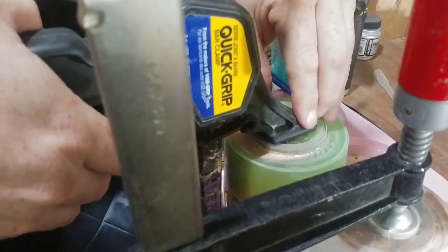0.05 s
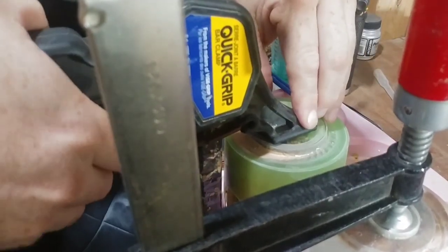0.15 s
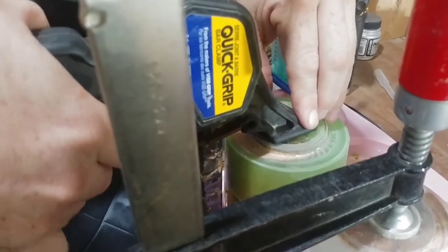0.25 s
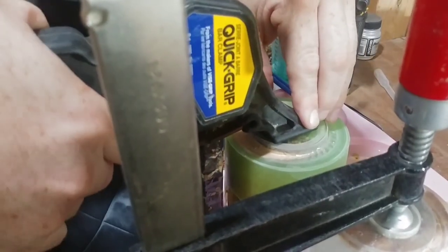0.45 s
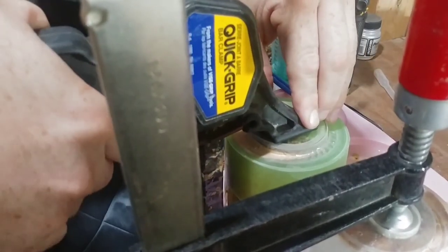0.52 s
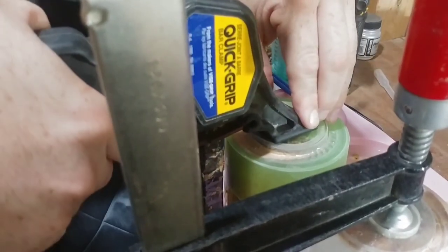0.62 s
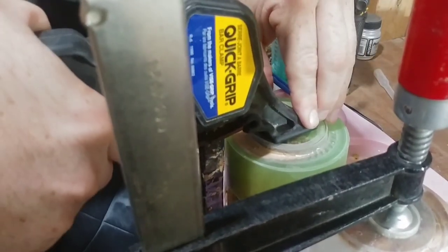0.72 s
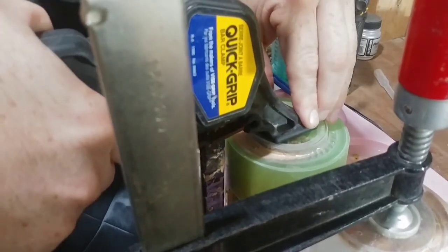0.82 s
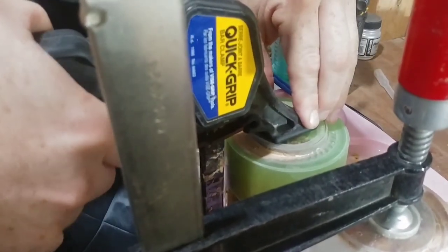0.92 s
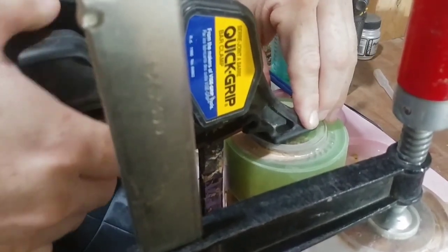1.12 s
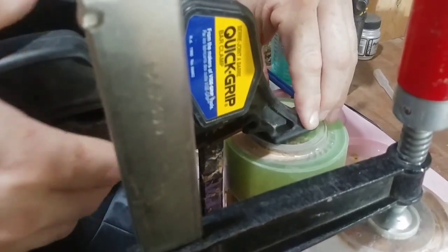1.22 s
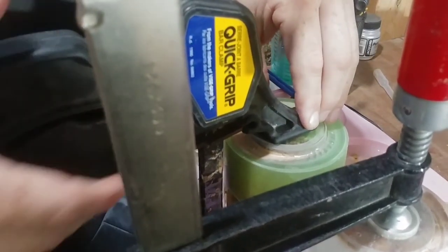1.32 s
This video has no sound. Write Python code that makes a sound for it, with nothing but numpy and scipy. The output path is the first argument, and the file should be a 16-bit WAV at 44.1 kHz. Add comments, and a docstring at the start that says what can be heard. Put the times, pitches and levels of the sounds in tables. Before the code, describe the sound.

A bar clamp ratchets tight with three hard, rising metallic clicks, after soft hand bumps on a bench

```python
"""Soft hand bumps come first, as ringing modes of the work with a grainy scuff, over swells of low rumble.
Then a bar clamp is squeezed: its ratchet plate snaps along the steel bar, the grip knocks and the wooden
bench booms, all from dying modes plus a noise crack. A weaker run of snaps follows, then a last bump.
Skin and grip rustle between as patchy noise; shop reflections follow each blow, and a two-tone mains hum
and room hiss last throughout."""
import sys
import numpy as np
from scipy import signal
from scipy.fft import rfft, irfft
from scipy.io import wavfile
from scipy.ndimage import uniform_filter1d

SR = 44100
rng = np.random.default_rng(int(sys.argv[2]) if len(sys.argv) > 2 else 0)


def bounce(signal):
    """Save signal as a 16-bit WAV file at the path given by the first command-line argument."""
    frames = np.transpose(np.atleast_2d(signal))
    limited = np.clip(frames, -1, 1)
    pcm = np.round(limited * 32767).astype(np.int16)
    wavfile.write(sys.argv[1], SR, pcm)


N = 59535  # length [samples]


def amp(db):
    """Turns decibels into a linear gain."""
    return 10 ** (np.asarray(db) / 20)


def evened(x):
    """Scales a signal to an rms of 1."""
    return x / np.sqrt(np.mean(x ** 2) + 1e-20)


def read(points, hz):
    """Reads a curve of (frequency, value) points along a logarithmic frequency axis."""
    f, value = np.transpose(points)
    return np.interp(np.log(hz + 1), np.log(f + 1), value)


def add(mix, start_s, sound):
    """Lays a two-channel sound into the mix, cut off at the end."""
    part = mix[:, round(start_s * SR):][:, :sound.shape[1]]
    part += sound[:, :part.shape[1]]


def coloured(x, gain):
    """Filters by a gain that is a function of frequency."""
    size = x.shape[-1]
    return irfft(rfft(x) * gain(np.fft.rfftfreq(size, 1 / SR)), size)


MODE_SCATTER_RAD, MODE_SCATTER_DB = 0.63, 1.5  # phase scatter near 1 kHz; level scatter


def ring(modes, t, rise_turns):
    """Dying sines; every blow lands a little differently and reaches each microphone differently."""
    hz, db, t60 = np.transpose(modes)[:, :, None]
    level, turn, left, right = rng.standard_normal((len(modes), 4)).T[:, :, None]
    spread = MODE_SCATTER_RAD * np.clip(hz / 1000, .3, 1.5)
    swell = 1 - np.exp(-t * hz / rise_turns)  # time constant in cycles of the mode
    envelope = amp(db + MODE_SCATTER_DB * level - 60 * t / t60) * swell
    ears = []
    for ear in (left, right):
        sines = np.sin(2 * np.pi * hz * t + spread * (turn + ear))
        ears.append((envelope * sines).sum(0))
    return np.array(ears)


# Snaps and knocks of the clamp: (time [s], level [dB], steel treble share [dB], grip body share [dB],
# bench boom share [dB], rebound delay [s], rebound against the blow [dB])
SNAPS = [(.445, -34.5, -55, 10.5, -5.5, .005, -47), (0.488, -44.5, -19.5, -16, 10, .008, -25),
         (0.508, -49.5, -34, 21.5, 9, .005, -14), (0.5557, -22.5, -11, 1.5, -5.5, .012, -17),
         (0.607, -18, -7, -3, -7.5, .011, -13), (0.69, -16.5, -2.5, -5.5, -11, .010, -32),
         (0.9179, -26, -32, 0, -13.5, .005, -10), (0.933, -43, -18, 2, -9, 0.0052, 1.5),
         (0.975, -45.5, -32, 4, -3.5, 0.0077, -11), (1.089, -58.5, -18, 9, 16.5, 0.018, -5.5)]
# Modes of bar and grip: (frequency [Hz], relative level [dB], t60 [s])
CLAMP_MODES = [(405, -4.5, 0.06), (536, -8, 0.086), (595, 0.5, 0.03), (825, -6.5, 0.01), (1082, 5, 0.022),
               (1276, -1, 0.03), (1442, -9.5, 0.03), (1489, 3, 0.029), (1572, -4.5, 0.037),
               (1810, -5, 0.025), (2116, -7, 0.045), (2380, -14, 0.027), (2790, -5, 0.0069),
               (3980, -6.5, 0.03)]
# Modes of the bench top: (frequency [Hz], relative level [dB], t60 [s])
BENCH_MODES = [(78.3, -6.5, 0.17), (124.9, -2, 0.21), (161.7, -10, 0.28), (208.7, -4, 0.13),
               (339.4, 1, 0.037)]
# Colour of the dry crack: (frequency [Hz], relative density [dB per Hz])
CRACK_COLOUR = [(400, -50), (900, -7.5), (1500, -11.5), (2400, -12.5), (3370, -15.5), (4200, -8),
                (5500, -7.5), (7500, -18), (10300, -46), (13300, -46), (16000, -37)]
# Stereo tilt of the clamp: (frequency [Hz], left minus right [dB])
CLAMP_LEFT = [(120, -1), (500, -0.5), (1300, -3), (2400, -1), (4400, 5.5), (8000, 4.5), (14000, -8)]
CRACK_DB, CRACK_T60_S = -0.5, 0.029
BITE_S = 0.00045  # rise time constant of everything above the grip body
BODY_HZ, TREBLE_HZ = 954, 2685  # the grip body rings below the first, the steel above the second
BODY_LAG_S = 0.003135  # the grip body answers a little after the steel
LEFT_DELAY_S = 0.000091  # the left channel follows the right by this much
BENCH_RISE_TURNS = 0.99  # rise time constant of a bench mode [cycles]


def snap(start_s, db, treble_db, body_db, boom_db, rebound_s, rebound_db):
    """A blow and its rebound ring the clamp: body, middle and steel in their shares; the bench booms along."""
    t = np.arange(12000) / SR
    crack = coloured(rng.standard_normal((3, len(t))), lambda f: amp(read(CRACK_COLOUR, f)))
    crack = crack[:1] + .5 * crack[1:]  # a shared part plus some of each ear's own
    crack = evened(crack) * amp(CRACK_DB - 60 * t / CRACK_T60_S)

    body = ring([mode for mode in CLAMP_MODES if mode[0] < BODY_HZ], t, rise_turns=0.17) / 2
    upper = ring([mode for mode in CLAMP_MODES if mode[0] >= BODY_HZ], t, rise_turns=0.22) / 2
    upper = (upper + crack) * (1 - np.exp(-t / BITE_S))
    middle = signal.sosfilt(signal.butter(3, TREBLE_HZ, "low", fs=SR, output="sos"), upper)
    steel = signal.sosfilt(signal.butter(3, TREBLE_HZ, "high", fs=SR, output="sos"), upper)

    late_body = np.roll(body, round(BODY_LAG_S * SR), 1)
    hit = amp(body_db) * late_body + middle + amp(treble_db) * steel
    rebound = np.roll(hit[::-1], round(rebound_s * SR), 1)  # with the ears swapped
    boom = ring(BENCH_MODES, t, BENCH_RISE_TURNS) * amp(boom_db)
    blow = hit + amp(rebound_db) * rebound + boom

    side = np.array([[1], [-1]]) / 2

    def placed(f):
        return amp(side * read(CLAMP_LEFT, f)) * np.exp(-2j * np.pi * f * side * LEFT_DELAY_S)

    lead = 128  # samples of room ahead of the blow for the stereo filter
    return start_s - lead / SR, amp(db) * coloured(np.roll(blow, lead, 1), placed)


# Soft bumps of the hand on the work: (time [s], level [dB], contact [s], scuff share [dB],
# scuff colour [Hz])
BUMPS = [(0.069, -57.5, 0.0042, 8.5, 1390), (0.229, -43.5, 0.0011, -3, 1160), (.235, -24, 0.003, -22, 2870),
         (0.26, -33, 0.0023, -44, 3000), (0.401, -35, 0.018, -55, 2470), (0.522, -35, 0.0018, -49, 2000),
         (0.957, -43.5, 0.0034, -30, 1480), (1.098, -46.5, 0.0021, -50, 2000)]
# Modes of the clamped work when bumped: (frequency [Hz], relative level [dB], t60 [s])
WORK_MODES = [(72.7, 3, 0.071), (210.3, 7.5, 0.063), (304, -12, 0.088), (404, -16, 0.1055),
              (787, 6.5, 0.059)]
SCUFF_RISE_S, SCUFF_T60_S = 0.0016, 0.12
SCUFF_GRAIN_DB = 8  # the grain moves the level at most this far up or down


def bump(start_s, db, contact_s, scuff_db, scuff_hz):
    """A dull knock on the work, pushed for the length of the contact, with a grainy scuff of skin."""
    t = np.arange(12000) / SR
    push = np.hanning(max(round(contact_s * SR), 4))
    ringing = ring(WORK_MODES, t, rise_turns=0.35)
    thud = signal.oaconvolve(ringing, push[None] / push.sum())[:, :len(t)]

    grain = evened(uniform_filter1d(rng.standard_normal(len(t)), size=90))
    grain = amp(SCUFF_GRAIN_DB * np.tanh(grain))
    scuff = grain * rng.standard_normal(thud.shape)
    scuff = coloured(scuff, lambda f: f / scuff_hz / (1 + (f / scuff_hz) ** 3))
    fade = (1 - np.exp(-t / SCUFF_RISE_S)) * amp(scuff_db - 60 * t / SCUFF_T60_S)
    return start_s, amp(db) * (thud * amp([[-1.5], [1.5]]) + evened(scuff) * fade)


# Stereo width of rustle and hiss: (frequency [Hz], left-right likeness [0 to 1])
NOISE_SAME = [(60, 0.64), (250, 1), (950, 0), (3800, 0), (15000, 0.038)]


def noise(spectrum, patchy_db):
    """Two-channel noise, patchy over time and frequency, with an rms of 1 above 300 Hz."""
    frames, hz = N // 256 + 5, np.fft.rfftfreq(1024, 1 / SR)
    a, b, c, d, patches = rng.standard_normal((frames, 513, 5)).T
    patches = uniform_filter1d(patches, 14, 0)  # smooth over frequency
    patches = evened(uniform_filter1d(patches, 8, 1))  # and over time
    same = np.clip(read(NOISE_SAME, hz), -1, 1)[:, None]
    left = a + 1j * b
    right = same * left + np.sqrt(1 - same ** 2) * (c + 1j * d)
    z = np.array([left, right]) * amp(read(spectrum, hz)[:, None] + patchy_db * patches)
    x = signal.istft(z, nperseg=1024, noverlap=768)[1][:, :N]
    return x / np.std(coloured(x, lambda f: f > 300))


# Colour of skin on the grip: (frequency [Hz], relative density [dB per Hz])
RUSTLE_COLOUR = [(60, -2.5), (300, 0.5), (700, -2), (1500, -10.5), (3000, -14), (5000, -17), (9000, -20.5),
                 (11000, -34), (16000, -24)]
# Swells of the rustle: (time [s], level above 300 Hz [dB])
RUSTLE_DB = [(0, -109), (0.15, -89), (0.203, -63), (.32, -66), (.44, -66), (0.602, -59), (.78, -73),
             (0.899, -83), (0.989, -60.5), (1.03, -76), (1.066, -62), (1.152, -62), (1.218, -67.5),
             (1.35, -70)]


def rustle():
    """Skin rubbing the grip: patchy noise that swells and fades with the handling."""
    level_db = np.interp(np.arange(N) / SR, *np.transpose(RUSTLE_DB))
    return amp(level_db) * noise(RUSTLE_COLOUR, patchy_db=2.5)


# Handling rumble through the bench: (time [s], level [dB])
RUMBLE_DB = [(0, -105), (.1, -51), (.18, -68), (.26, -29.5), (0.342, -58), (.42, -74), (.53, -32.5),
             (0.648, -51), (0.771, -41.5), (0.839, -53), (0.902, -86), (0.971, -48), (1.05, -83),
             (1.13, -51), (1.35, -85)]
RUMBLE_HZ = 75.6  # the noise falls away steeply above this


def rumble():
    """Low, nearly mono shaking while the hands work, a touch stronger on the right."""
    a = rng.standard_normal((3, N))
    low = coloured(a[:1] + 0.13 * a[1:], lambda f: 1 / (1 + (f / RUMBLE_HZ) ** 4))
    level_db = np.interp(np.arange(N) / SR, *np.transpose(RUMBLE_DB))
    return evened(low) * amp(level_db) * amp([[-1.5], [1.5]])


# Decay of the workshop: (frequency [Hz], t60 [s])
SHOP_T60 = [(100, 0.16), (500, 0.17), (2000, 0.12), (6000, 0.11), (14000, 0.21)]
SHOP_DB, SHOP_SAME = -5.5, 0.42  # reflection level; left-right likeness


def shop(x):
    """Dense reflections from bench and walls, each band dying at its own speed."""
    a, b = rng.standard_normal((2, SR // 2)) * np.minimum(np.arange(SR // 2) / 300, 1)
    ears = [a, SHOP_SAME * a + np.sqrt(1 - SHOP_SAME ** 2) * b]
    hz, t, z = signal.stft(ears, SR, nperseg=256)
    tail = signal.istft(z * amp(-60 * t / read(SHOP_T60, hz)[:, None]), SR, nperseg=256)[1]
    # many surfaces: no narrow band stands out from its neighbours
    spectrum = rfft(tail)
    power = abs(spectrum) ** 2
    peaks = uniform_filter1d(power, size=50) / uniform_filter1d(power, size=900)
    tail = irfft(spectrum / np.sqrt(peaks))[:, :SR // 3]
    return amp(SHOP_DB) * signal.fftconvolve(x, tail / np.linalg.norm(tail[0]), axes=1)[:, :N]


# Hum tones: (frequency [Hz], level before the waver [dB rms], left minus right [dB])
HUM_TONES = [(117.8, -57.5, 2.5), (246.6, -66, -3.5)]
HUM_WAVER_DB = .8  # rms of the level waver


def hum():
    """Mains hum as low sines whose levels waver at mixed rates from 1 to 9 Hz."""
    t, out = np.arange(N) / SR, np.zeros((2, N))
    for hz, db, left_db in HUM_TONES:
        waver = evened(sum(np.sin(2 * np.pi * (f * t + rng.random())) for f in np.geomspace(1, 9, 8)))
        level_db = db + HUM_WAVER_DB * waver + np.array([[left_db], [-left_db]]) / 2
        out += np.sqrt(2) * amp(level_db) * np.sin(2 * np.pi * (hz * t + rng.random()))
    return out


# Colour of the room hiss: (frequency [Hz], relative density [dB per Hz])
HISS_COLOUR = [(30, 8.5), (70, 2), (170, 0), (420, -1), (1000, -14), (3000, -21), (8000, -22),
               (10500, -27.5), (13000, -20.5), (16000, -27)]
HISS_DB = -67  # level above 300 Hz


def hiss():
    """Room hiss: faint patchy noise without swells."""
    return amp(HISS_DB) * noise(HISS_COLOUR, patchy_db=3.0)


def scene():
    """Plays snaps and bumps into the workshop and lays the other layers over them."""
    hands = np.zeros((2, N))
    for row in SNAPS:
        add(hands, *snap(*row))
    for row in BUMPS:
        add(hands, *bump(*row))
    return hands + rustle() + rumble() + shop(hands) + hum() + hiss()


LOW_CUT_HZ, EDGE_HZ = 73.5, 15900


def record(dry):
    """The microphone's bass roll-off, then the band limit."""
    cut = signal.sosfilt(signal.butter(3, LOW_CUT_HZ, "high", fs=SR, output="sos"), dry)
    band_limit = signal.firwin(511, EDGE_HZ, window=("kaiser", 9), fs=SR)
    return signal.oaconvolve(cut, band_limit[None], "same")


dry = scene()
out = record(dry)
bounce(out)
```